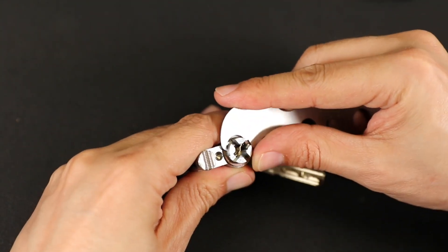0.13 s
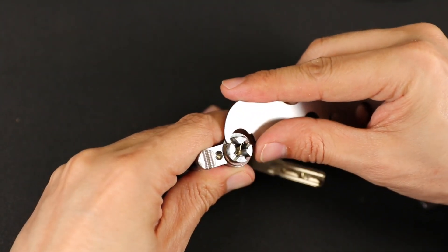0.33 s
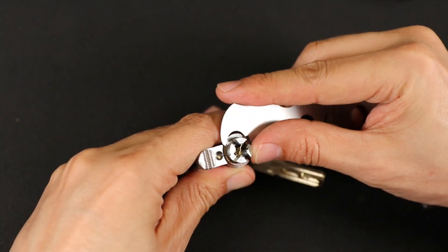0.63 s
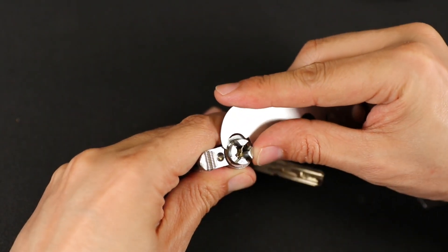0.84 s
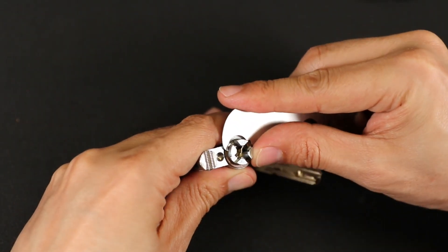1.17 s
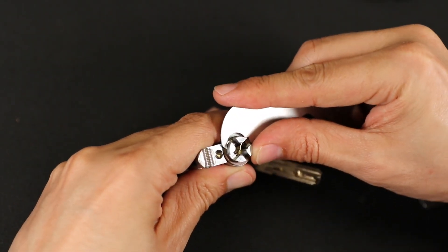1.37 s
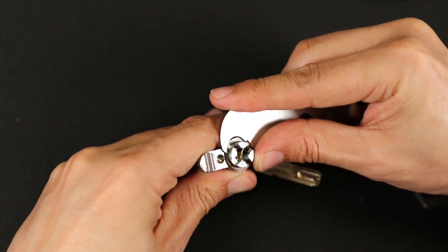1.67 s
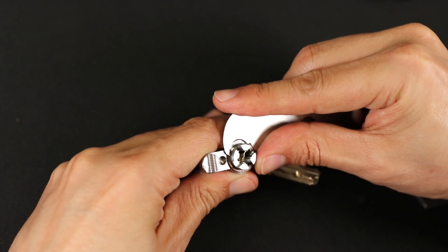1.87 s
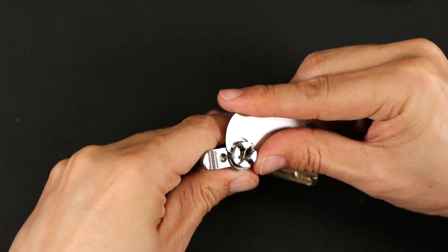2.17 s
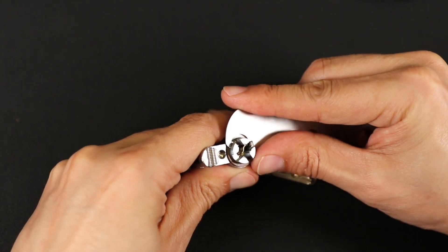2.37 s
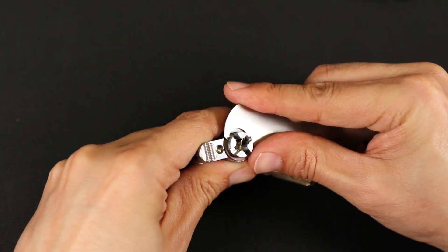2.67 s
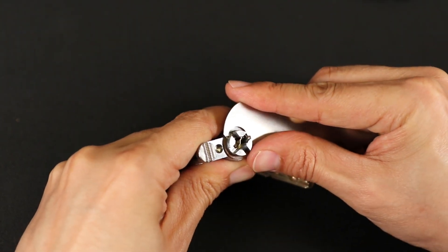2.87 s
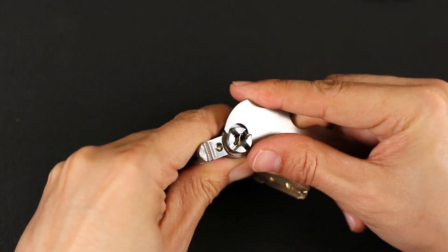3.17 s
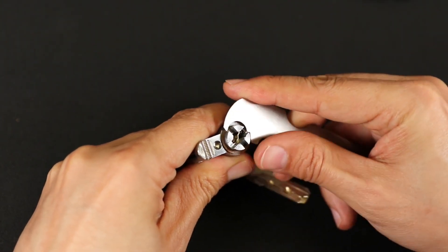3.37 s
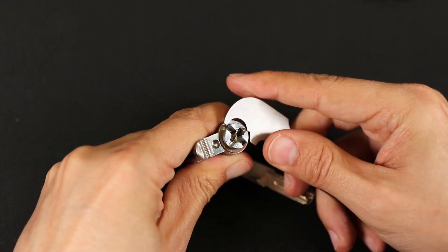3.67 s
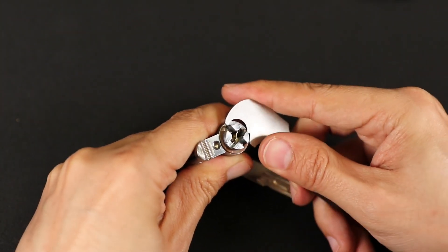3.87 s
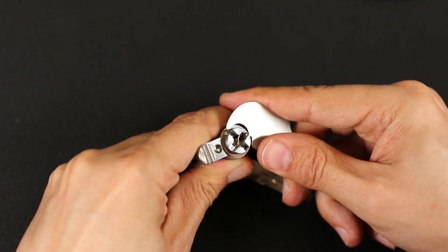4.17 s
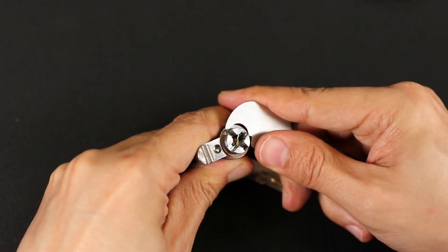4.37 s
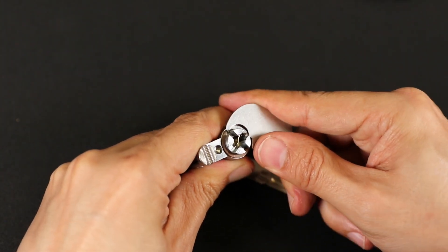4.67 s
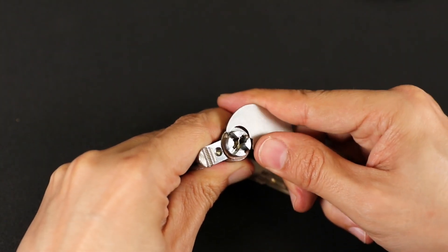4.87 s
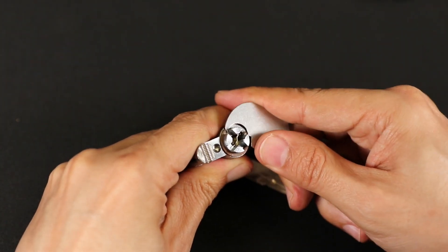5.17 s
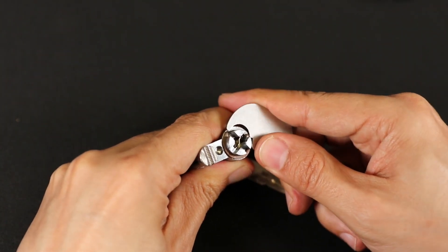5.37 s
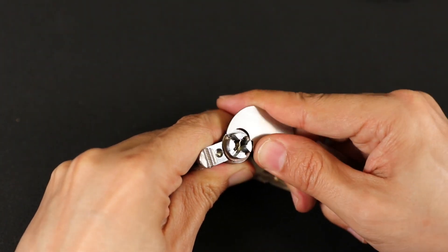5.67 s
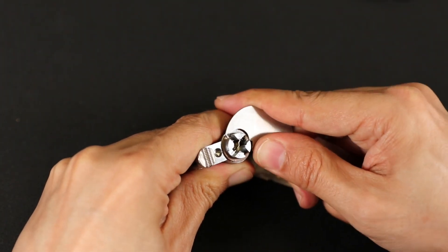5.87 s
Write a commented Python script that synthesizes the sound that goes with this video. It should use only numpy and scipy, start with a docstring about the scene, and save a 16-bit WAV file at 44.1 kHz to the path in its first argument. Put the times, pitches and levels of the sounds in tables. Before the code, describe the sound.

A small metal lock is worked in the hands, close to the microphone in a small quiet room. A burst of clicks and hollow pops opens, then scattered light ticks and faint skin rubbing. A pair of pops comes after two seconds, a bright cluster of clicks around three and a half, and two sharp clicks just after five. A low machinery hum with faint high pips runs throughout.

```python
"""Metal lock cylinder in the hands

A lock cylinder is worked between the fingers over a bench in a small quiet room. Its contacts are
noisy impacts ringing damped modes; hollow pops are sinking sines, thuds are pushed low resonances.
Skin rubs as flickering friction noise, with one soft rasp. Far machinery hums as tones and narrow
noise bands, with faint sine pips near 1 kHz, over the broad noise of room and microphone.
"""
import sys
import numpy as np
from scipy import signal
from scipy.fft import rfft, irfft
from scipy.io import wavfile
from scipy.ndimage import uniform_filter1d

SR = 44100
rng = np.random.default_rng(int(sys.argv[2]) if len(sys.argv) > 2 else 0)


def gain_from_db(level_db):
    """Turn a decibel level (scalar or array-like) into a linear amplitude factor."""
    decades = np.asarray(level_db, float) / 20
    return 10 ** decades


def to_wav(sig):
    """Store sig (one row per channel, or 1-D mono) as 16-bit WAV at the path in sys.argv[1].

    Samples outside -1..1 are clipped; the rate is SR.
    """
    pcm = np.clip(np.atleast_2d(sig), -1, 1) * 32767
    pcm = np.round(pcm).astype(np.int16)
    wavfile.write(sys.argv[1], SR, pcm.T)  # frames by channels


N = 265129

# hollow pops of falling pitch: (time [s], peak level [dB], first frequency [Hz], last frequency [Hz])
POP_EVENTS = [(.012, -33, 1420, 590), (.0195, -34.5, 1410, 400), (.057, -42.5, 1080, 900),
              (2.162, -42.5, 760, 462), (2.3497, -35, 1200, 750), (2.3545, -43, 1120, 920),
              (2.3667, -31.5, 1090, 480), (2.4155, -36, 1200, 750), (2.4233, -30.5, 1150, 480)]


def rms_one(x):
    """Normalises the mean power, so that a gain in dB sets the rms level."""
    return x / np.sqrt(np.mean(x ** 2) + 1e-30)


def coloured(spectrum, grain_db=0):
    """Spectral shaping of stationary noise to unit rms; uneven sample sizes make it gritty."""
    hz, level_db = np.transpose(spectrum)
    bin_hz = np.arange(N // 2 + 1) * SR / N + 1e-3
    shape = gain_from_db(np.interp(np.log(bin_hz), np.log(hz), level_db, left=-90, right=-90))
    grain_sizes = gain_from_db(grain_db * np.minimum(rng.exponential(1, N), 7))
    grains = rng.standard_normal(N) * grain_sizes
    return rms_one(irfft(rfft(grains) * shape, N))


def resonance(x, hz, t60_s):
    """Damped harmonic oscillator as a two-pole filter: a unit click starts a sine of about unit height."""
    radius = gain_from_db(-60 / (t60_s * SR))
    angle = 2 * np.pi * hz / SR
    return signal.lfilter([0, np.sin(angle)], [1, -2 * radius * np.cos(angle), radius ** 2], x + 1e-18)


def add(out, start_s, sound):
    """Linear superposition of a sound from its starting time on."""
    i = round(start_s * SR)
    out[i:i + len(sound)] += sound[:N - i]


def hum():
    """Sum of broadband noise, noise-driven narrow resonances, a motor tone and a frequency-modulated whine."""
    # room rumble and microphone hiss: (frequency [Hz], relative density [dB per Hz])
    floor_spectrum = [(12, -22), (20, -25), (71, -3), (174, -5), (224, -10.5), (281, -12), (428, -17),
                      (729, -21.5), (994, -23.5), (1110, -26.5), (1600, -28), (4930, -35), (12500, -36.5),
                      (15200, -40), (15900, -42)]
    # resonances of the rumble: (frequency [Hz], bandwidth [Hz], rms level [dB])
    rumble_modes = [(58.5, 3.7, -64), (80.5, 2.4, -76), (98, 7.7, -53.5), (122, 13, -59),
                    (144.6, 3.9, -53.5), (279.9, 21.3, -59.5), (564.6, 24, -71), (1544, 41, -75.5)]
    floor_db = -51
    tone_hz, tone_db = 177.3, -53
    whine_hz, whine_deviation_hz, whine_db = 12021, 3, -83

    out = gain_from_db(floor_db) * coloured(floor_spectrum)
    for hz, width_hz, db in rumble_modes:
        t60_s = np.log(1000) / (np.pi * width_hz)
        drive = rng.standard_normal(N + SR)
        steady = resonance(drive, hz, t60_s)[SR:]  # the first second lets the mode build up
        out = out + gain_from_db(db) * rms_one(steady)

    tremble = rms_one(uniform_filter1d(rng.standard_normal(N), size=2000))
    whine = np.sin(2 * np.pi * np.cumsum(whine_hz + whine_deviation_hz * tremble) / SR)
    tone = np.sin(2 * np.pi * tone_hz * np.arange(N) / SR)
    return out + np.sqrt(2) * (gain_from_db(tone_db) * tone + gain_from_db(whine_db) * whine)  # root 2: peak to rms


def pips():
    """Windowed sine bursts at an even pace, each a little off the common pitch and level."""
    # runs of faint pips: (time [s], number of pips, typical peak level [dB])
    pip_runs = [(.354, 5, -60), (1.145, 5, -57), (1.82, 2, -58), (2.84, 2, -55), (3.285, 1, -54),
                (3.845, 5, -58), (4.635, 2, -60), (4.983, 1, -56), (5.189, 3, -57), (5.72, 2, -63)]
    pitch_hz, length_s, spacing_s = 988, 0.028, 0.1185
    pitch_spread, level_spread_db = 0.02, 1  # the first is a fraction of the pitch
    out, t = np.zeros(N), np.arange(round(length_s * SR)) / SR
    for start_s, count, db in pip_runs:
        for k in range(count):
            pitch_offset, level_offset = rng.standard_normal(2)
            tone = np.sin(2 * np.pi * pitch_hz * (1 + pitch_spread * pitch_offset) * t)
            height = gain_from_db(db + level_spread_db * level_offset)
            add(out, start_s + k * spacing_s, height * np.hanning(len(t)) * tone)
    return out


def rub():
    """Friction noise of skin on metal, flickering in level as the skin slips and holds."""
    # course of the rubbing before its flicker: (time [s], level [dB])
    rub_course = [(0, -64.5), (.3, -64.5), (.5, -79), (1.0, -66.5), (1.6, -72.5), (2.0, -65.5), (2.3, -68),
                  (2.5, -62), (3.0, -62.5), (3.11, -60), (3.25, -66), (3.42, -60), (3.75, -67.5),
                  (4.0, -63.5), (4.3, -70), (4.7, -67), (5.05, -75), (5.3, -62.5), (5.5, -76),
                  (5.76, -66.5), (5.85, -70), (6.01, -73)]
    # timbre of the rubbing: (frequency [Hz], relative density [dB per Hz])
    rub_spectrum = [(500, 10.5), (1500, 5.5), (3000, 5), (5000, -6.5), (7600, 2.5), (10000, -5),
                    (12000, -14), (16000, -18)]
    flicker_db, flicker_step = 3.5, 300  # standard deviation; samples
    times_s, course_db = np.transpose(rub_course)
    knots = np.arange(0, N + flicker_step, flicker_step)
    flicker = np.interp(np.arange(N), knots, rng.standard_normal(len(knots)))
    gain_db = np.interp(np.arange(N) / SR, times_s, course_db) + flicker_db * flicker
    return gain_from_db(gain_db) * coloured(rub_spectrum, grain_db=2.8)


def rasp():
    """Amplitude-shaped narrow-band noise: a soft hiss swells, holds and fades."""
    # timbre of the rasp: (frequency [Hz], relative density [dB per Hz])
    rasp_spectrum = [(1000, -26), (1400, -5), (1750, -7), (2400, -21)]
    start_s, end_s, fade_s, held_db = 0.031, 0.34, 0.06, -60
    t = np.arange(N) / SR
    swell = np.clip(np.minimum(t - start_s, end_s - t) / fade_s, 0, 1)
    return gain_from_db(held_db) * swell * coloured(rasp_spectrum)


def thuds():
    """Forced response of one low, damped resonance to a soft noisy push."""
    # dull thuds through hands and bench: (time [s], peak level [dB], frequency [Hz], T60 [s])
    bench_thuds = [(.027, -34, 260, .17), (1.068, -36, 268, 0.042), (1.482, -44, 293, 0.065),
                   (2.035, -39, 303, 0.045), (3.027, -37, 270, .045), (3.486, -48, 295, 0.066),
                   (3.697, -43.5, 322, 0.062), (5.237, -39.5, 228, .064)]
    push_s = 0.0019  # the push is strongest at this time
    # a hollow thud follows each pop: 2.5 ms later, 8 dB lower, at 480 Hz, with a T60 of 0.03 s
    after_pops = [(s + 0.0025, db - 8, 480, 0.03) for s, db, *_ in POP_EVENTS]
    out, t = np.zeros(N), np.arange(6000) / SR
    for start_s, db, hz, t60_s in [*bench_thuds, *after_pops]:
        push = rng.standard_normal(len(t)) * t * np.exp(-t / push_s)
        thud = resonance(push, hz, t60_s)
        add(out, start_s, gain_from_db(db) * thud / np.abs(thud).max())
    return out


def pops():
    """Transient sine with a downward frequency glide, lasting only a few cycles."""
    glide_s, rise_s, fall_s = 0.002, 0.00046, 0.0024  # time constants
    out, t = np.zeros(N), np.arange(1000) / SR
    for start_s, db, first_hz, last_hz in POP_EVENTS:
        hz = last_hz + (first_hz - last_hz) * np.exp(-t / glide_s)
        swell = (1 - np.exp(-t / rise_s)) * np.exp(-t / fall_s)
        tone = np.sin(2 * np.pi * np.cumsum(hz) / SR)
        add(out, start_s, gain_from_db(db) * swell / swell.max() * tone)
    return out


def strike(upper_db, tilt_db, knock_db, hardest_hz, rattle_t60_s):
    """Modal excitation: a blow and its dying rattle are heard directly and through the lock's modes."""
    # modes of the lock, damped by the fingers: (frequency [Hz], relative level [dB], T60 [s])
    lock_modes = [(1180, -2, .018), (1420, 0, .018), (1750, -2, .014), (2090, -2, .014), (2450, -3, .014),
                  (2800, -1, .016), (3450, 0, .014), (3850, 0, .014), (4400, 1, .014), (4800, 1, .014),
                  (5260, 1, .014), (5700, 0, .012), (6300, -1, .012), (6800, -2, .012), (7550, -1, .014),
                  (7950, -1, .014), (8350, -2, .012), (8750, -1, .012), (9300, -1, .012), (9950, -1, .012),
                  (10550, 0, .016), (11000, -2, .012), (11700, -1, .012), (12800, 0, .016),
                  (13400, -4, .012), (14300, -8, .012)]
    # edges of the knock, lower, upper and treble bands: (frequency [Hz])
    band_edges_hz = [900, 2000, 4200, 9000, 15500]
    grain_db, first_db = 3.0, 10.0  # unevenness of the impacts; first blow above that unevenness
    shoulder_db = -3.5  # the bands on either side of the upper one, before the tilt
    hardest_db, hardest_width_hz = 12, 450
    crack_db = 3  # the bare crack over the rings
    t, head = np.arange(3000) / SR, round(0.004 * SR)

    impacts = rng.standard_normal(len(t)) * gain_from_db(grain_db * rng.standard_normal(len(t)))
    impacts[0] = gain_from_db(first_db + grain_db)
    rattle = impacts * gain_from_db(-60 * (t / rattle_t60_s) ** 0.98)  # nearly exponential decay

    mode_hz = np.array([mode[0] for mode in lock_modes])
    strengths_db = 1.5 * rng.standard_normal(len(lock_modes))  # each contact shares its blow differently
    for hz in hardest_hz:  # neighbouring modes share the extra blow
        strengths_db += hardest_db * np.exp(-((mode_hz - hz) / hardest_width_hz) ** 2)
    rings = [gain_from_db(db + extra_db) * rms_one(resonance(rattle, hz, t60_s))
             for (hz, db, t60_s), extra_db in zip(lock_modes, strengths_db)]

    sound = np.zeros(len(t))
    bands_db = knock_db, upper_db + shoulder_db - tilt_db, upper_db, upper_db + shoulder_db + tilt_db
    for low_hz, high_hz, band_db in zip(band_edges_hz, band_edges_hz[1:], bands_db):
        inside = [ring for ring, hz in zip(rings, mode_hz) if low_hz <= hz < high_hz]
        ringing = signal.lfilter(*signal.butter(1, low_hz / 3, "high", fs=SR), sum(inside))
        ringing = ringing / np.sqrt(len(inside))
        # random signs: the same impacts, unrelated in phase from band to band
        scattered = rattle * rng.choice([-1, 1], len(t))
        band = signal.butter(3, (low_hz, high_hz), "band", fs=SR, output="sos")
        crack = rms_one(signal.sosfilt(band, scattered))
        part = ringing + gain_from_db(crack_db) * crack
        sound += gain_from_db(band_db) * part / np.sqrt(np.mean(part[:head] ** 2))  # rms of the first 4 ms
    return sound


def lock():
    """Impact sound of metal contacts, with a short bright tick opening each pop."""
    # metal contacts: (time [s], upper band rms [dB], tilt [dB per band], low knock rms [dB],
    # then one or more modes struck hardest [Hz], 0 = none)
    contacts = [(.0118, -52, 3, -49, 0), (.015, -44.5, 0, -57, 0), (0.0197, -46, -7, -56, 0),
                (0.0247, -26, -2.5, -56, 8750), (0.0517, -41, -7.5, -63, 3450), (0.1943, -31.5, -1, -74, 0),
                (0.2373, -51, 6, -63, 12800, 7950), (0.2802, -48.5, -3.5, -54, 0),
                (.3741, -68, -16, -55, 0), (0.4518, -46.5, -5.5, -57, 2800), (0.498, -58.5, -7, -57.5, 0),
                (0.522, -61, -2, -61, 4400), (0.6203, -58, -7, -55, 0), (0.6296, -64.5, -15, -66, 3450),
                (0.8368, -40, -3, -53, 0), (1.066, -50.5, -4, -70, 0), (1.069, -37, -2, -44.5, 6300, 1420),
                (1.4811, -47, -0.5, -58, 0), (2.0358, -43, 0, -53, 4800, 6800), (2.043, -55.5, -8, -46, 0),
                (2.163, -67, -11, -56, 0), (2.6055, -68, -6.5, -52, 0), (2.7014, -65, -1, -56, 7550),
                (2.767, -60, 1, -59, 7550), (2.8374, -59, 1, -55, 7550),
                (3.0266, -46, -7.5, -39.5, 1420, 2090), (3.2176, -61, 4, -62, 0),
                (3.4402, -34.5, 0.5, -45, 3850, 7550, 10550), (3.46, -36, 1.5, -56, 3850, 6300),
                (3.4861, -33, 6, -47, 2800, 8350), (3.693, -50, 6, -60, 0),
                (3.6975, -31.5, 5, -48, 1180, 2800, 10550), (3.7647, -47.5, -6, -60, 2090, 4800),
                (5.0763, -32.5, -1.5, -64, 3450, 9300), (5.2373, -30, 4.5, -36.5, 1420, 12800),
                (5.7909, -58.5, -7, -68, 0), (5.881, -61.5, -5, -75, 0)]
    # modes that a pop's tick strikes hardest: (frequency [Hz])
    tick_modes_hz = 2800, 7550, 8350, 9300
    rattle_t60_s = 0.03
    tick_db, tick_t60_s, tick_lead_s = -17, 0.009, 0.0008  # level relative to the pop; lead before it
    out = np.zeros(N)
    for start_s, upper_db, tilt_db, knock_db, *hardest_hz in contacts:
        add(out, start_s, strike(upper_db, tilt_db, knock_db, hardest_hz, rattle_t60_s))
    for pop_s, pop_db, *_ in POP_EVENTS:
        tick = strike(pop_db + tick_db, 0, pop_db + tick_db, tick_modes_hz, tick_t60_s)
        add(out, pop_s - tick_lead_s, tick)
    return out


def room(x):
    """Convolution with a short diffuse tail, duller than the direct sound; the highest treble is weak."""
    t60_s, tail_db, build_up_s = 0.12, -15.5, 0.0068
    wall_cut_hz, treble_cut_hz = 8000, 14000
    t = np.arange(SR // 2) / SR
    tail = rng.standard_normal(len(t)) * gain_from_db(-60 * t / t60_s) * np.minimum(t / build_up_s, 1)
    tail = signal.lfilter(*signal.butter(1, wall_cut_hz, fs=SR), tail)
    response = gain_from_db(tail_db) * tail / np.sqrt(np.sum(tail ** 2))
    response[0] = 1  # direct sound
    response = signal.lfilter(*signal.butter(6, treble_cut_hz, fs=SR), response)
    return signal.fftconvolve(x, response)[:N]


def scene():
    """Superposition of the hum and pips with the sounds of hands and lock reverberated by the room."""
    hands_and_lock = rub() + rasp() + thuds() + pops() + lock()
    return (hum() + pips() + room(hands_and_lock))[None]


def top_cut(x):
    """Nothing passes above the cut-off."""
    return signal.sosfilt(signal.butter(12, 16650, fs=SR, output="sos"), x)


def record(dry):
    """High-pass response of the microphone, which drops the deepest bass below 22 Hz."""
    bass_cut = signal.butter(4, 22, "high", fs=SR, output="sos")
    mix = signal.sosfilt(bass_cut, dry)
    return top_cut(mix)


dry = scene()
out = record(dry)
to_wav(out)
```